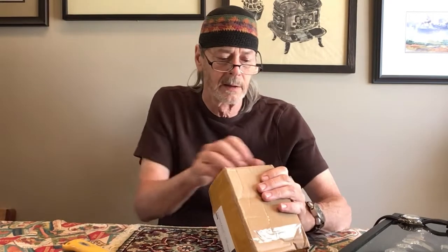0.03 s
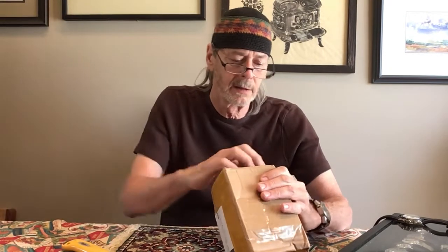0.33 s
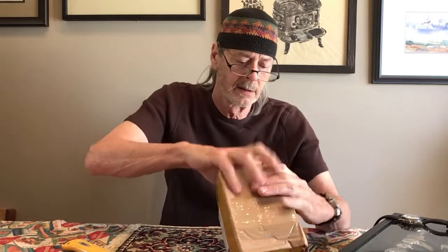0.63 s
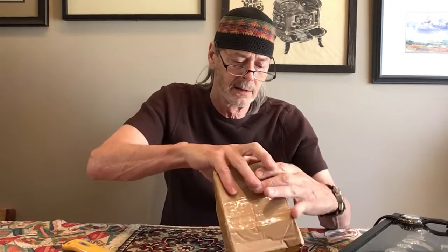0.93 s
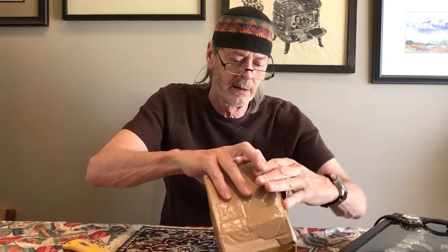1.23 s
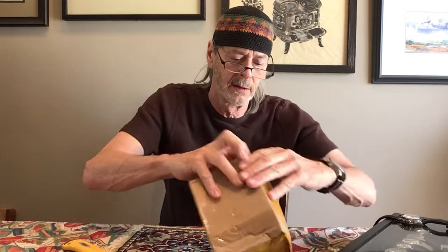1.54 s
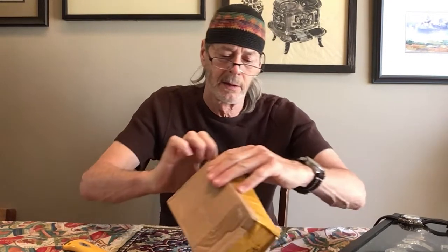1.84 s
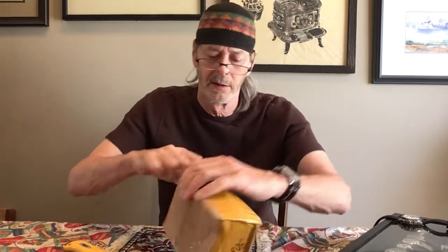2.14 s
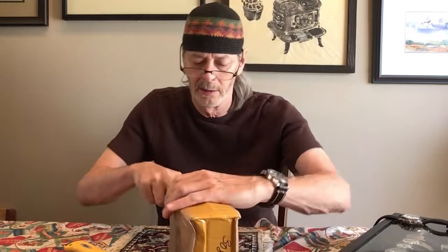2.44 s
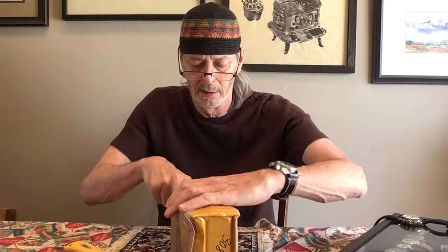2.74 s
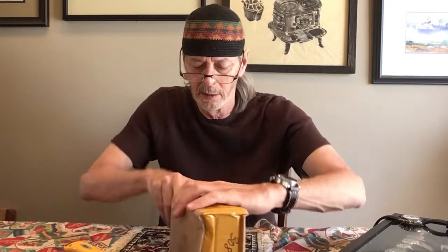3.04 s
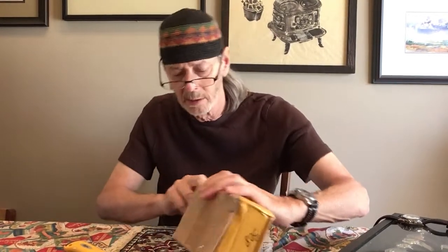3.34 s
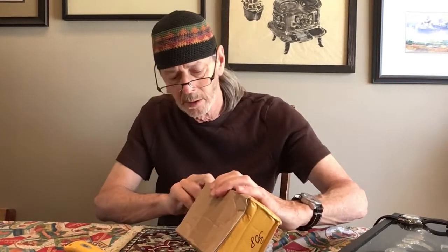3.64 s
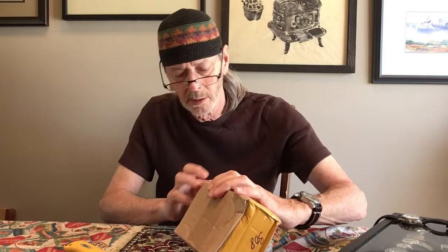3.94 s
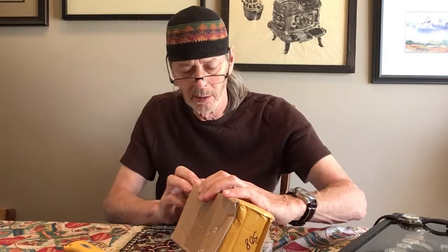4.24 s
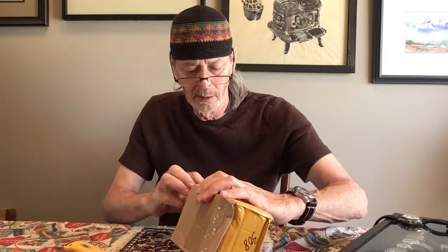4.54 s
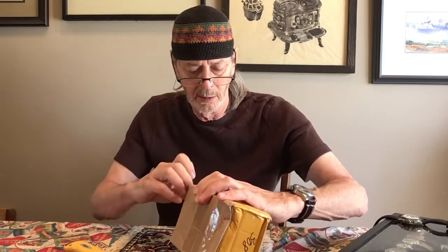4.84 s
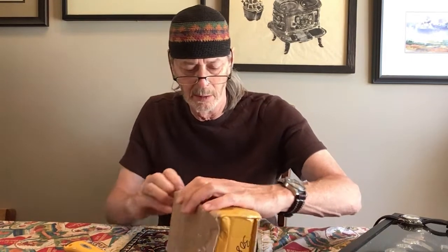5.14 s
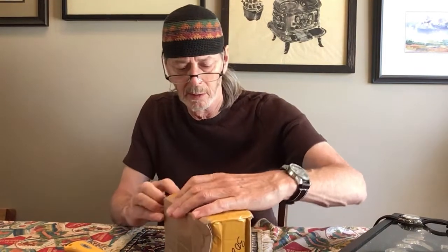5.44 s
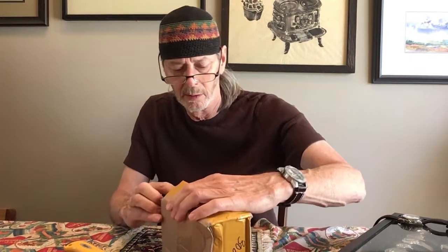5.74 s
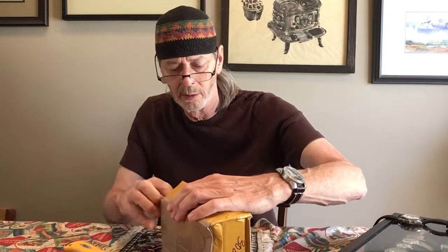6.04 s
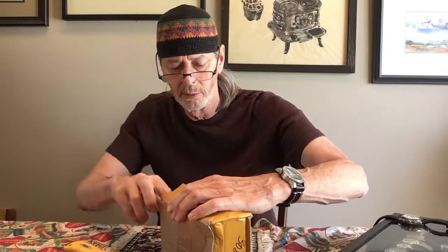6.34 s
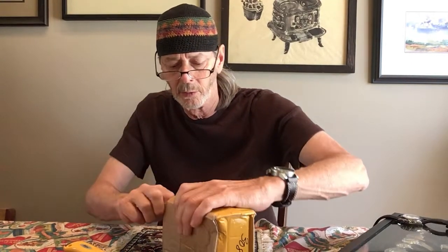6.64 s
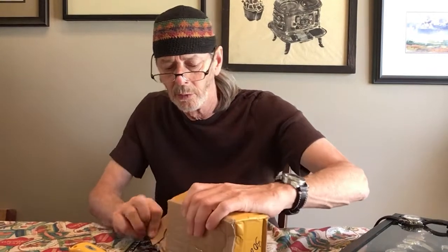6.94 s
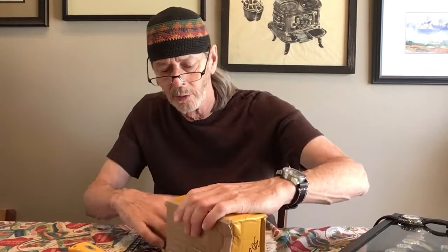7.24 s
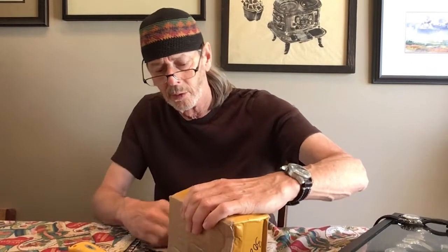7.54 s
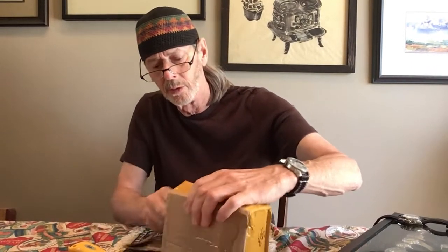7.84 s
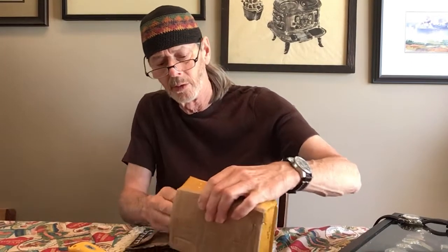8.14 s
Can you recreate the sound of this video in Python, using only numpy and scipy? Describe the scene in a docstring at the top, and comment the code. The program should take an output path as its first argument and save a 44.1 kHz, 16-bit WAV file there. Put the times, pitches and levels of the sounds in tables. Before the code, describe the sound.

Hands turn a taped cardboard parcel on a table, making light hollow knocks and a soft, uneven rubbing on tape and paper. A fingernail picks at the tape with small crisp ticks. Late on, one strip comes off in a short, loud rip that makes the box drum. Firmer rubbing, two scrapes and a few knocks follow. The room is small and quiet, with the parcel straight in front of the microphone.

```python
"""Hands turn a taped cardboard parcel on a cloth-covered table in a small, quiet room. From the start,
fingers knock the hollow box, it rocks on the table, and sliding skin draws friction noise from tape and
paper. A nail scrapes the cardboard and picks at the tape, which buckles with a tick. After six seconds
a fingertip squeaks, then one strip rips off in a quick run of slips that set the box drumming.
Firmer rubbing, two more scrapes and a few knocks follow."""
import sys
import numpy as np
from scipy import signal
from scipy.fft import rfft, irfft, next_fast_len
from scipy.io import wavfile
from scipy.ndimage import uniform_filter1d, map_coordinates

SR = 44100
rng = np.random.default_rng(int(sys.argv[2]) if len(sys.argv) > 2 else 0)


def wav_record(signal):
    """Record a signal, one row per channel, as 16-bit PCM in the file named by sys.argv[1]."""
    frames = np.transpose(np.atleast_2d(signal))
    bounded = np.clip(frames, -1, 1)
    # unit amplitude maps onto the largest positive 16-bit level
    quanta = np.round(bounded * 32767).astype(np.int16)
    wavfile.write(sys.argv[1], SR, quanta)


N = 366162

# Spectra of the noises. Each row: frequency in Hz, relative spectral density in dB.
AIR_SPECTRUM = [(15, -35), (25, 4), (70, -6.5), (141, 1.5), (180, -11), (256, -3.5), (301, -12.5),
                (373, -3), (451, -16), (1190, -17.5), (1330, -22.5), (6050, -36.5), (7510, -37),
                (16000, -43)]
TAPE_HISS = [(1500, -70), (4000, -18.5), (5800, -6), (7000, 0.5), (9300, 1.5), (12000, -2.5), (15500, -12)]
PAPER_RASP = [(500, -27), (1400, 3.5), (2200, -4.5), (3000, 1.5), (3900, 0.5), (5500, -1), (8000, -13),
              (14000, -15)]
BOX_RUSTLE = [(60, -20), (160, -5.5), (300, -4.5), (650, 1.5), (950, -5), (1400, -11.5), (2200, -15),
              (4000, -18), (9000, -42)]
BOX_DRUM = [(50, -49), (150, -11.5), (290, -2), (520, 2), (820, 2.5), (1300, 1.5), (2000, -15.5),
            (3500, -13.5), (8000, -50)]
WRAP_CRACKLE = [(300, -50), (1500, -4), (3000, -7), (4500, -4.5), (7000, 1.5), (10000, 2), (13000, -3.5),
                (16000, -12)]
TABLE_RUMBLE = [(25, -22), (42, 4), (62, -17.5), (79, 5.5), (100, -22), (135, -3.5), (230, -24.0),
                (450, -25), (1500, -84)]
# Likeness of diffuse sound in the two channels. Each row: frequency in Hz, left-right correlation.
COHERENCE = [(30, 0.05), (70, 0.48), (125, -0.28), (250, 0.31), (600, 0.44), (3000, -0.52), (12000, 0.16)]
# Decay of the room. Each row: frequency in Hz, time to fall 60 dB in seconds.
REVERB_TIMES = [(100, 0.87), (400, 0.4), (900, 0.51), (3000, 0.63), (8000, 0.34), (15000, 0.19)]
# Panel modes, and those the rip stresses. Each row: frequency in Hz, bandwidth in Hz, gain in dB.
BOX_MODES = [(301, 42, 6.5), (406, 170, 0), (530, 130, -4), (772, 116, -5), (915, 95, 4), (1125, 52, -16),
             (1360, 46, -7), (2150, 430, 10)]
RIP_MODES = [(275, 160, -14.5), (850, 290, -5.5)]
# The parcel rocking. Each row: start in seconds, length in seconds, relative level in dB.
ROCKINGS = [(0.0, 0.037, -55), (0.33, 0.054, -66), (0.644, 0.048, -58), (1.988, 0.19, -66),
            (2.52, 0.12, -71.5), (2.767, 0.065, -64.5), (6.165, 0.026, -58), (6.695, 0.051, -57),
            (7.392, .05, -58)]
# The holding hand creeping. Each row: time in seconds, hiss level in dB, relative rustle level in dB.
HAND_CREEP = [(0.0, -62.5, -47.5), (0.13, -77.5, -59), (0.45, -73.5, -63), (0.9, -75, -70.5),
              (1.85, -69.5, -60), (2.65, -72, -69), (3.05, -74.5, -62.5), (3.35, -86.5, -74.5),
              (3.68, -98, -78.5), (4.1, -85, -73), (5.5, -77, -71.5), (5.93, -82, -74), (6.2, -73.5, -61.5),
              (7.0, -70.5, -71.5), (7.4, -63.5, -59), (7.56, -73.5, -68.5), (8.3, -57.5, -68)]
# Finger strokes. Each row: start in seconds, length in seconds, hiss level in dB, bite in dB.
# Bite raises the rasp against the hiss and is low on smooth tape.
FINGER_STROKES = [(0.0, 0.024, -74, 11), (0.45, 0.05, -65, -0.5), (0.55, 0.073, -69.5, -7),
                  (0.632, 0.091, -65.5, -2.5), (0.822, 0.042, -66, -10), (1.043, .11, -67.5, -1.5),
                  (1.188, 0.11, -72.5, 3.5), (1.33, 0.052, -69.5, -7), (1.493, 0.088, -62, -11),
                  (1.545, 0.098, -55.5, -14), (1.64, 0.18, -64.5, -3.5), (1.875, 0.083, -66, -6),
                  (1.974, 0.056, -59, -11), (2.236, .11, -72, -2), (2.501, 0.086, -70, 0),
                  (2.732, .1, -67, 0.5), (2.84, 0.17, -67.5, -4), (3.02, .14, -64.5, -2.5),
                  (3.765, .066, -73.5, -3.5), (3.908, 0.019, -66.5, -5), (4.025, 0.044, -74.5, -16),
                  (4.069, 0.07, -67, -12), (4.354, 0.057, -73.5, -10), (4.48, 0.085, -73, -6),
                  (4.587, 0.19, -75.5, -10), (4.89, .18, -68, -33), (5.162, 0.027, -63.5, 1.5),
                  (5.2, 0.3, -70.5, -5), (5.544, .12, -70.5, 0), (5.66, 0.12, -75.5, -5),
                  (6.31, 0.27, -63, -4), (7.011, 0.14, -59.5, -29), (7.258, 0.09, -56, -6),
                  (7.357, 0.091, -55.5, -5), (7.653, 0.12, -60.5, -6), (7.75, .14, -56, -4.5),
                  (7.958, 0.031, -53.5, -4), (8.0, 0.054, -59.5, -10), (8.065, 0.036, -54, -3),
                  (8.116, 0.055, -52, 0.5), (8.25, 0.048, -60.5, -5)]
# Nail scrapes. Each row: start in seconds, length in seconds, initial level in dB, panel pitch in Hz.
NAIL_SCRAPES = [(2.423, 0.14, -59.5, 650), (7.252, 0.078, -47.5, 940), (8.114, 0.093, -54, 1280)]
# Tape and paper under a nail. Each row: start in seconds, relative level in dB, band centre in Hz.
NAIL_TICKS = [(0.631, -36.5, 8200), (1.25, -38.5, 6050), (2.307, -41, 4530), (2.789, -43, 4000),
              (2.919, -38.5, 5170), (3.079, -36.5, 5000), (4.546, -46, 8000), (4.791, -33.5, 8900),
              (4.806, -41, 8000), (4.852, -45, 8500), (4.858, -28.5, 10000), (4.86, -31, 9300),
              (4.998, -39.5, 9600), (6.003, -32.5, 6900), (6.076, -43, 8100), (6.093, -30.5, 8400),
              (6.151, -30.5, 6100), (6.637, -28.5, 7640), (6.646, -26, 7400), (6.664, -16.5, 6500),
              (6.666, -22, 8500), (6.68, -16.5, 5000), (6.927, -43, 7700), (7.372, -33, 3930)]
# Fingers and table striking the box. Each row: start in seconds, level in dB, nominal pitch in Hz.
BOX_KNOCKS = [(0.004, -38, 440), (0.017, -37.5, 464), (0.029, -37, 520), (0.325, -44.5, 610),
              (0.457, -40.5, 510), (0.4824, -32, 690), (0.485, -31.5, 650), (0.491, -30.5, 610),
              (0.6317, -30.5, 463), (1.986, -47, 800), (2.113, -45, 550), (2.529, -42, 700),
              (2.534, -35, 800), (3.079, -37, 680), (3.0961, -23, 745), (3.196, -38.5, 684),
              (3.927, -43, 760), (5.631, -39, 840), (6.002, -40, 730), (6.009, -41, 540),
              (6.152, -29.5, 690), (6.385, -43, 530), (6.665, -30.5, 830), (6.736, -13.5, 754),
              (6.749, -20, 760), (6.758, -17.5, 730), (7.229, -43.5, 730), (7.265, -33.5, 1060),
              (7.373, -42.5, 382), (7.517, -44, 760), (7.745, -38.5, 565), (7.963, -45, 990),
              (8.117, -20.5, 1120)]
# The pull on the strip. Each row: time in seconds, effort in dB.
TAPE_PULL = [(6.625, -60), (6.674, -44), (6.679, -28), (6.695, -30), (6.706, -37.5), (6.718, -27),
             (6.733, -33.5), (6.752, -29), (6.812, -46.5)]


def amp(db):
    """Amplitude grows tenfold every 20 dB."""
    return 10 ** (np.asarray(db) / 20)


def unit(x):
    """Normalisation to rms 1."""
    return x / np.sqrt(np.mean(x ** 2) + 1e-20)


def along(points, hz):
    """Interpolation of (Hz, value) points on a logarithmic frequency axis."""
    f, v = np.transpose(points)
    return np.interp(np.log(hz + 1), np.log(f + 1), v)


def gains(rows):
    """Interpolation in time: one envelope per dB column, fading out beyond the table's ends."""
    s, *cols = np.transpose(rows)
    t = np.arange(N) / SR
    inside = np.clip(1 + np.minimum(t - s[0], s[-1] - t) / 0.028, 0, 1)
    return [inside * amp(np.interp(t, s, c)) for c in cols]


def gesture(start, length, attack_s, release_s):
    """Envelope of one movement: linear rise, hold and exponential decay."""
    t = np.arange(N) / SR - start
    return np.clip(t / attack_s, 0, 1) * np.exp(-np.maximum(t - length, 0) / release_s)


def wobble(rate):
    """Smooth random modulation: a spline through rate knots a second."""
    return map_coordinates(rng.standard_normal(int(N * rate / SR) + 4), [np.arange(N) * rate / SR])


def add(track, s, sound):
    """Superposition of a sound on the track at s seconds."""
    part = track[max(round(s * SR), 0):][:len(sound)]
    part += sound[:len(part)]


def filtered(x, response):
    """Linear filtering: the spectrum of x is multiplied by a frequency response."""
    m = next_fast_len(N + SR // 2)
    return irfft(rfft(x, m) * response(np.fft.rfftfreq(m, 1 / SR)), m)[..., :N]


def coloured(x, spectrum, size=8192):
    """A minimum-phase filter imposes the spectrum on x causally, at rms 1."""
    cepstrum = irfft(np.log(amp(along(spectrum, np.fft.rfftfreq(size, 1 / SR)))))
    pulse = irfft(np.exp(rfft(np.r_[cepstrum[0], 2 * cepstrum[1:size // 2]], size)))
    return unit(signal.fftconvolve(x, pulse)[:N])


def grains(rate, spread_db):
    """Shot noise: fibres catch and let go in random impulses, rate a second, at rms 1."""
    caught = rng.random(N) < rate / SR
    return unit(caught * rng.choice([-1, 1], N) * amp(spread_db * np.clip(rng.standard_normal(N), -2, 2)))


def diffuse_noise(spectrum):
    """A diffuse field is only partly coherent between two points: stereo noise at rms 1."""
    def response(hz):
        angle = np.arccos(np.clip(along(COHERENCE, hz), -1, 1)) / 2
        return amp(along(spectrum, hz)) * [np.cos(angle), np.sin(angle)]
    mid, side = filtered(rng.standard_normal((2, N)), response)
    return unit(np.array([mid + side, mid - side]))


def reverberation(x, width=0.73):
    """Wall reflections merge into a diffuse tail; each frequency decays at its own exponential rate."""
    hz, t, noise = signal.stft(rng.standard_normal((2, SR // 2)), SR, nperseg=256)
    decay = amp(-60 * t / along(REVERB_TIMES, hz)[:, None])
    mid, side = signal.istft(noise * decay, SR, nperseg=256)[1]
    tail = np.array([mid + width * side, mid - width * side])
    delayed = np.pad(x, (SR // 250, 0))
    return signal.fftconvolve(delayed[None], tail / np.linalg.norm(tail[0]), axes=1)[:, :N]


def table_rumble(gain_db=4.0):
    """Forced vibration: the rocking parcel drives the low modes of the table top."""
    rocking = sum(amp(db) * gesture(s, length, attack_s=0.0081, release_s=0.079)
                  for s, length, db in ROCKINGS)
    return amp(gain_db) * rocking * diffuse_noise(TABLE_RUMBLE)


def panel_mode(x, hz, width_hz):
    """Resonance: one panel passes a band around its natural frequency, at rms 1."""
    return unit(signal.lfilter(*signal.iirpeak(hz, hz / width_hz, fs=SR), x))


def box(x, ring):
    """Modal superposition: the direct push on the cardboard plus its panel modes, weighted by ring."""
    def modes(f):
        return sum(amp(db) * 1j * f * width / (hz * hz - f * f + 1j * f * width)
                   for hz, width, db in BOX_MODES)
    return filtered(x, lambda f: (1 + ring * modes(f)) / (1 + ring / 2))


def patchy(x, depth_db, bins):
    """Random spectral modulation: the colour drifts as fingers cross tape, seams and bare paper."""
    spectra = signal.stft(x, nperseg=512)[2]
    field = rng.standard_normal(spectra.shape)
    for _ in range(2):
        field = uniform_filter1d(uniform_filter1d(field, size=bins, axis=0), size=12, axis=1)
    return signal.istft(spectra * amp(depth_db * unit(field)), nperseg=512)[1][:N]


def rubbing(rustle_db=-66.5, rustle_coupling=0.6, edge_s=0.024, crinkle_db=-10):
    """Sliding friction: under the skin tape hisses, paper rasps and coarser catches stir the box."""
    creep_hiss, creep_rustle = gains(HAND_CREEP)
    # incoherent sources add in power; the layers are hiss, rasp and rustle
    power = np.array([creep_hiss, amp(-4) * creep_hiss, amp(-1) * creep_rustle]) ** 2
    mean_rasp_db = np.mean([db + bite_db for _, _, db, bite_db in FINGER_STROKES])
    for start, length, db, bite_db in FINGER_STROKES:
        t = np.arange(round((length + edge_s) * SR)) / SR
        contact = np.sin(np.pi / 2 * np.clip(np.minimum(t, t[-1] - t) / edge_s, 0, 1)) ** 2
        pressure = .5 + np.sin(np.pi * t / t[-1]) ** 2  # greatest in mid stroke
        stir_db = rustle_db + rustle_coupling * (db + bite_db - mean_rasp_db)
        for layer, layer_db in zip(power, [db, db + bite_db - 0.5, stir_db]):
            add(layer, start - edge_s / 2, amp(layer_db) ** 2 * contact * pressure)
    hiss = patchy(coloured(grains(rate=4000, spread_db=1.5), TAPE_HISS), depth_db=1.1, bins=10)
    rasp = patchy(coloured(grains(rate=1100, spread_db=2.0), PAPER_RASP), depth_db=3.0, bins=7)
    creases = coloured(grains(rate=55, spread_db=2.5), WRAP_CRACKLE)
    hiss = unit(hiss) + amp(crinkle_db) * creases
    catches = coloured(grains(rate=900, spread_db=2.0), BOX_RUSTLE)
    rustle = patchy(box(catches, ring=0.09), depth_db=1.5, bins=3)
    grip = wobble(45)  # the fingers stick and slide unevenly
    layers = [unit(hiss * amp(2 * grip)), unit(rasp * amp(1.4 * grip)), unit(rustle * amp(2 * grip))]
    return np.sum(np.sqrt(power) * layers, axis=0)


def squeak(start=6.23, length=0.34, level_db=-67.0, slow_hz=1720, fast_hz=2180, waver_hz=70):
    """Stick-slip: a fingertip on tape gives a thin, broken tone whose pitch follows its speed."""
    progress = np.clip((np.arange(N) / SR - start) / length, 0, 1)
    speed = np.sin(np.pi * progress ** 0.72)
    pitch_hz = slow_hz + (fast_hz - slow_hz) * speed + waver_hz * wobble(70)
    phase = 2 * np.pi * np.cumsum(pitch_hz) / SR
    narrow_band = wobble(420) * np.cos(phase) + wobble(420) * np.sin(phase)
    tone = unit(narrow_band * amp(4 * wobble(37)))
    return amp(level_db) * gesture(start, length, attack_s=0.0082, release_s=0.015) * tone


def scrapes(fade_db=-6):
    """Driven resonance: a juddering nail keeps one panel ringing, more weakly as it goes."""
    out, t = np.zeros(N), np.arange(N) / SR
    catches = grains(rate=700, spread_db=0.5)
    for s, length, db, hz in NAIL_SCRAPES:
        level = amp(db + fade_db * np.clip((t - s) / length, 0, 1))
        contact = gesture(s, length, attack_s=0.005, release_s=0.025)
        out += level * contact * panel_mode(catches, hz, width_hz=280)
    return out


def ticks(rise_s=0.0002, snap_t60=0.003, flutter_db=-24, flutter_t60=0.022, half_width_hz=2300):
    """Buckling: stiff film gives way under a nail with a snap and flutters for a moment."""
    out, t = np.zeros(N), np.arange(SR // 40) / SR
    decay = amp(-60 * t / snap_t60) + amp(flutter_db - 60 * t / flutter_t60)
    envelope = decay * (1 - np.exp(-t / rise_s))
    for s, db, hz in NAIL_TICKS:
        band = signal.butter(1, [hz - half_width_hz, hz + half_width_hz], "band", fs=SR)
        snap = signal.lfilter(*band, envelope * rng.standard_normal(len(t)))
        add(out, s, amp(db) * 2.6 * snap / np.linalg.norm(snap))
    return out


def swing(hz, cycles):
    """Damped oscillation of a panel, as pressure with peak 1; cycles sets the envelope's time scale."""
    t = np.arange(SR // 20) / SR
    age = t * hz / cycles
    pressure = np.gradient(age ** 2 * np.exp(-1.5 * age) * np.sin(2 * np.pi * hz * t))
    return pressure / np.abs(pressure).max()


def knocks(thump_hz=195, thump_db_per_octave=-24, scuff_t60=0.015, crunch_t60=0.048):
    """Impact excitation: a struck panel swings briefly while the contact scuffs and crunches its paper."""
    swings, scuffs, crunches = np.zeros((3, N))
    t = np.arange(SR // 20) / SR
    median_hz = np.median([hz for _, _, hz in BOX_KNOCKS])
    for s, db, hz in BOX_KNOCKS:
        add(swings, s, amp(db - 0.66) * swing(0.77 * hz, cycles=0.4))  # damping lowers the pitch
        thump_db = db - 19 + thump_db_per_octave * np.log2(hz / median_hz)  # low panels thump more
        add(swings, s, amp(thump_db) * swing(thump_hz, cycles=0.55))
        add(scuffs, s, amp(db - 21 - 60 * t / scuff_t60))
        add(crunches, s, amp(db - 20 - 60 * t / crunch_t60))
    crunch = crunches * coloured(grains(rate=3400, spread_db=1.5), BOX_DRUM)
    scuff = scuffs * coloured(rng.standard_normal(N), WRAP_CRACKLE)
    return box(swings, ring=0.83) + crunch + scuff


def rip(crackle_db=-2.5, drum_db=1.3, dulling_db_per_s=65, swelling_db_per_s=75,
        snag_hz=260, snag_decay_s=0.0025, snag_share=0.55):
    """Stick-slip peeling: bright as the glue parts, duller as the pull shakes the whole box."""
    effort, = gains(TAPE_PULL)
    start, end = TAPE_PULL[0][0], TAPE_PULL[-1][0]
    from_middle_s = np.clip(np.arange(N) / SR, start, end) - (start + end) / 2
    tearing = effort * amp(crackle_db - dulling_db_per_s * from_middle_s)
    drumming = effort * amp(drum_db + swelling_db_per_s * from_middle_s)
    # the peel front snags and jumps at an uneven rate
    snag_count = np.floor(np.cumsum(snag_hz * amp(5 * wobble(200))) / SR)
    snags = np.diff(snag_count, prepend=0) * amp(3.3 * wobble(500))
    jumps = unit(signal.lfilter([1], [1, -np.exp(-1 / (snag_decay_s * SR))], snags))
    jerks = 1 - snag_share + snag_share * jumps
    # the pull frees its energy evenly, in a few big jumps or many small ones
    jerks /= np.sqrt(np.abs(uniform_filter1d(jerks ** 2, size=SR // 90)) + 1e-6)
    crackle = coloured(jerks * grains(rate=7000, spread_db=3.0), WRAP_CRACKLE)
    tugs = coloured(jerks * grains(rate=3000, spread_db=0), BOX_DRUM)
    drum = unit(box(tugs, ring=0.62))
    panels = sum(amp(db) * panel_mode(drum, hz, width) for hz, width, db in RIP_MODES)
    return tearing * crackle + drumming * unit(drum + panels)


def scene(reverb_db=-10.5, air_db=-65.5):
    """Superposition: the parcel almost straight ahead, its reverberation, the table and the room air."""
    parcel = rubbing() + knocks() + ticks() + scrapes() + squeak() + rip()
    direct = parcel * amp([[-.4], [.4]])
    reflected = amp(reverb_db) * reverberation(parcel)
    return direct + reflected + table_rumble() + amp(air_db) * diffuse_noise(AIR_SPECTRUM)


def record(dry, low_cut_hz=40, top_hz=16000):
    """Band limiting: a third-order high-pass sheds the deepest bass, and nothing passes above top_hz."""
    return filtered(dry, lambda hz: (hz < top_hz) * hz ** 3 / np.sqrt(hz ** 6 + low_cut_hz ** 6))


dry = scene()
out = record(dry)
wav_record(out)
```